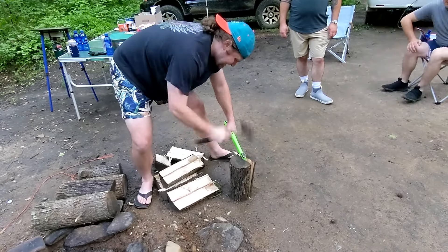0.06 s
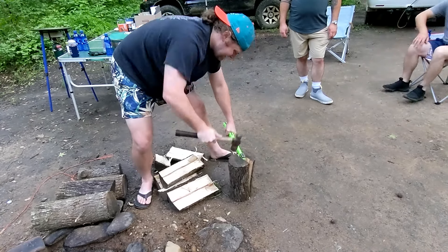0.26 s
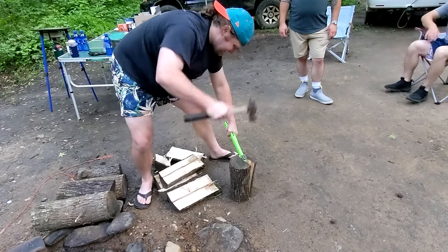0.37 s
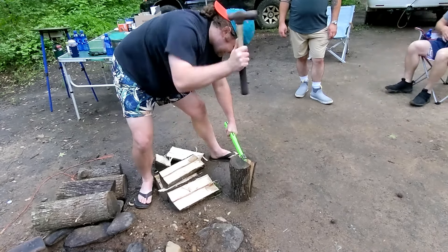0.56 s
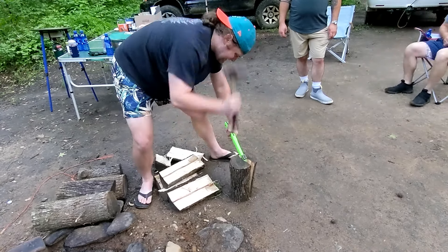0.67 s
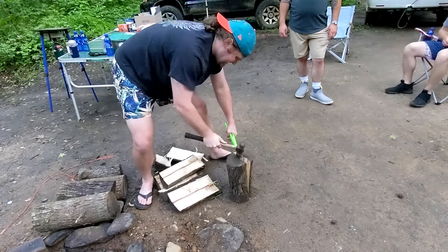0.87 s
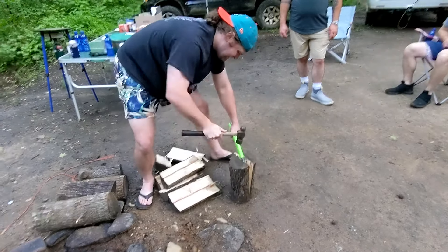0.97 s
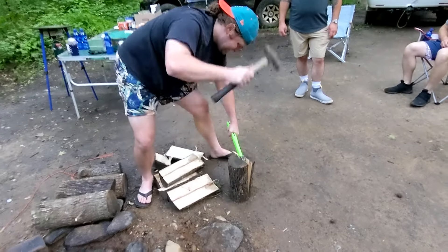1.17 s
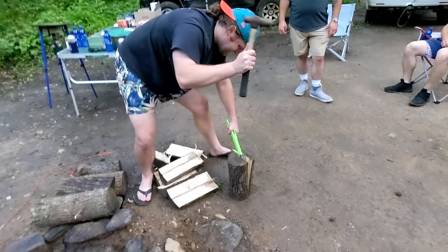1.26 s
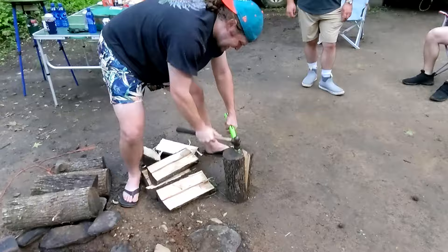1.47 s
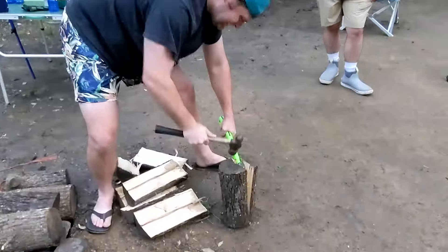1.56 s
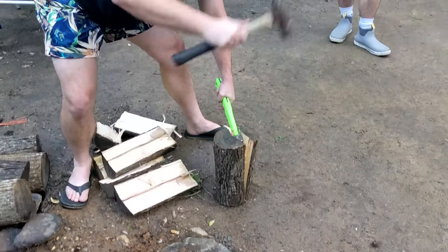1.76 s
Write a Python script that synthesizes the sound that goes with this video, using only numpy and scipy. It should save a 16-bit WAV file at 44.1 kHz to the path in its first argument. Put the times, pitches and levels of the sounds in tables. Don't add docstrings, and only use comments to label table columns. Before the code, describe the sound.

Three loud, bright steel clanks as a hatchet is pounded into a log outdoors, close phone microphone, soft leafy rustle behind, handling knocks on the left after the second blow.

```python
import sys
import numpy as np
from scipy import signal
from scipy.fft import rfft, irfft
from scipy.io import wavfile
from scipy.ndimage import uniform_filter1d, minimum_filter1d

SR = 44100
rng = np.random.default_rng(int(sys.argv[2]) if len(sys.argv) > 2 else 0)


def how_loud(loudness_db):
    steps = np.asarray(loudness_db, float) / 20
    return 10 ** steps


def materialize(psi):
    bounded = np.clip(np.atleast_2d(psi).T, -1, 1)
    quanta = np.round(bounded * 32767).astype(np.int16)
    wavfile.write(sys.argv[1], SR, quanta)


N = 79380
T = np.arange(N) / SR
LEFT_RIGHT = np.array([[1.], [-1.]])


def curve(table, hz):
    table = np.array(table, float)
    return np.interp(np.log(hz), np.log(table[:, 0]), table[:, 1])


def shape(x, table):
    hz = np.arange(N // 2 + 1) * SR / N + 1
    return irfft(rfft(x) * how_loud(curve(table, hz)), N)


def colour(x, table):
    hz = np.maximum(np.arange(N // 2 + 1) * SR / N, 1)
    below = np.maximum(np.log2(table[0][0] / hz), 0)
    above = np.maximum(np.log2(hz / table[-1][0]), 0)
    gain = how_loud(curve(table, hz) - 18 * below - 60 * above)
    return irfft(rfft(x) * gain / np.sqrt(np.mean(gain ** 2)), N)


def ring(x, hz, width_hz):
    return signal.lfilter(*signal.iirpeak(hz, hz / width_hz, SR), x)


def pair(like, pan_db=0.):
    mid, side = rng.standard_normal((2, N))
    like = np.clip(like, 0, 1)
    both = np.sqrt((1 + like) / 2) * mid + np.sqrt((1 - like) / 2) * side * LEFT_RIGHT
    return both * how_loud(LEFT_RIGHT * pan_db / 2)


def burst(at, rise, fall):
    u = T - at - rise
    return np.exp(np.where(u < 0, -(u / rise) ** 2 * 2, -u / fall))


def walk(rate):
    k = int(SR / rate)
    steps = np.repeat(rng.standard_normal(N // k + 1), k)
    return 2.23 * uniform_filter1d(uniform_filter1d(steps, k), k)[:N]


def bands(table):
    spec = rfft(colour(pair(0.29), table))
    hz = np.arange(N // 2 + 1) * SR / N + 1
    for centre in 30 * 2 ** (np.arange(26) / 3):
        slope = np.clip(3 * np.log2(hz / centre), -1, 1)
        yield centre, irfft(spec * np.cos(slope * np.pi / 2) ** 2, N)


# (frequency [Hz], density [dB per Hz])
CAMP_SPECTRUM = [(18, -47.5), (30, -11), (255, -8), (367, -8), (541, -4.5), (1870, -6), (2560, -4),
                 (5580, -12), (10000, -43), (13000, -78), (22000, -120)]
# (frequency [Hz], L-R level [dB])
CAMP_PAN = [(100, 3.5), (700, 2), (2300, 7), (5000, 0.5), (9000, -9.5)]


def camp():
    level_db, drift_db_per_s = -44.5, -1
    hush_db = sum(-1.5 * burst(blow[0], 0.12, 0.055) * (T > blow[0]) for blow in BLOWS)
    floor_db = level_db + drift_db_per_s * T + hush_db + 0.27 * walk(7.1)
    out = 0
    for hz, noise in bands(CAMP_SPECTRUM):
        pan_db = curve(CAMP_PAN, hz) / 2 * LEFT_RIGHT
        out = out + noise * how_loud(floor_db + 1.5 * walk(11.96) + pan_db)
    return out


# (frequency [Hz], density [dB per Hz])
TREES_SPECTRUM = [(530, -53), (900, -23.5), (1390, -7.5), (1570, -10), (2270, -1.5), (4290, -2.5),
                  (5690, -4), (6820, -8), (10000, -41.5), (13000, -66), (22000, -120)]
# (frequency [Hz], 60 dB decay [s])
TREES_T60 = [(1000, 1.6), (2000, 1.34), (3000, 1.32), (6000, 0.94), (9000, 0.97)]
# (level [dB], L-R level at its start [dB])
TAILS = [
    (-28, 6.7),
    (-28, 11.8),
    (-27.5, 12),
]
# (time [s], level [dB], L-R level [dB])
EARLIER = (-0.45, -34, 6)


def trees():
    pan_end_db, pan_s, onset_s = -2.5, 0.11, 0.01
    sources = [EARLIER] + [(blow[0], *tail) for blow, tail in zip(BLOWS, TAILS)]
    out = 0
    for hz, noise in bands(TREES_SPECTRUM):
        for at, db, pan_db in sources:
            u = np.maximum(T - at, 0)
            drift_db = (pan_db - pan_end_db) * np.exp(-u / pan_s)
            pan = pan_end_db + curve(CAMP_PAN, hz) + drift_db
            fade = db - 60 * u / curve(TREES_T60, hz) + 1.2 * walk(30)
            out = out + noise * how_loud(fade + LEFT_RIGHT * pan / 2) * (1 - np.exp(-u / onset_s))
    return out


# (time [s], level [dB], pitch [Hz], decay [s])
KNOCKS = [(.905, -40.5, 388, 0.026), (1.0413, -13, 240, 0.0028), (1.055, -25.5, 242, .004),
          (1.0688, -16, 305, 0.0023), (1.1005, -10, 276, 0.0021), (1.1656, -7, 282, 0.0026),
          (1.191, -22.5, 224, .008), (1.24, -29, 320, 0.0075), (1.2611, -11, 420, 0.0033),
          (1.271, -27, 478, 0.0059), (1.704, -35, 527, 0.009)]


def knocks():
    out = 0
    for at, db, hz, fall in KNOCKS:
        u = np.maximum(T - at, 0)
        turns = hz * (u + 1.09 * 0.00091 * (1 - np.exp(-u / 0.0028)))
        out = out - how_loud(db) * np.sin(2 * np.pi * turns) * np.exp(-u / fall)
    return signal.sosfilt(signal.butter(2, 183.6, "high", fs=SR, output="sos"), out)


# (time [s], level [dB], pitch [Hz], length [s])
TICKS = [(1.042, -29, 2200, 0.0054), (1.068, -29.5, 2400, 0.0041), (1.068, -43, 1900, .001),
         (1.100, -31, 1800, 0.0025), (1.1636, -24.5, 1470, 0.0013), (1.1669, -19, 2280, 0.00068),
         (1.243, -34, 1280, 0.0083), (1.2612, -19, 1510, 0.0027), (1.268, -33, 2060, 0.0027),
         (1.71, -33.5, 1420, 0.0032), (1.263, -24, 2680, 0.0013)]


def nail_ticks():
    noise = np.sign(rng.standard_normal(N))
    out = 0
    for at, db, hz, length in TICKS:
        width_hz = hz * 0.79
        tick = ring(ring(noise * burst(at - length, length, length), hz, width_hz), hz, width_hz)
        out = out + how_loud(db) * 4.42 * tick
    return out


# (start [s], length [s], level [dB], centre [Hz])
RUMBLES = [
    (1.037, 0.094, -43, 90),
    (1.155, 0.048, -47, 90),
    (1.26, 0.055, -63, 90),
]


def hand_rumble():
    noise = rng.standard_normal(N)
    out = 0
    for at, length, db, hz in RUMBLES:
        out = out + how_loud(db) * 26.0 * ring(ring(noise, hz, hz), hz, hz) * burst(at, 0.023, length)
    return out


def fingers():
    left = knocks() + nail_ticks() + hand_rumble()
    return shape(left, [(3500, 1), (6000, -45)]) * how_loud(np.array([[0.], [-40]]))


# (frequency [Hz], density [dB per Hz])
SLAP_SPECTRUM = [(180, -32), (300, -59), (1080, -1.5), (1990, 4.5), (2520, 10.5), (3090, 7.5), (6830, -10),
                 (9290, -26), (10000, -51), (13000, -73), (22000, -120)]
# (delay [s], level [dB], L-R level [dB], rise [s], fall [s])
SLAPS = [
    (0.0343, -13.5, 6, 0.0077, 0.008),
    (0.0328, -14.5, 7.5, 0.0099, 0.0085),
    (0.037, -16, 11, 0.003, 0.0073),
]


def van_slap(k, at):
    lag, db, pan_db, rise, fall = SLAPS[k]
    return how_loud(db) * colour(pair(0.51, pan_db) * burst(at + lag, rise, fall), SLAP_SPECTRUM)


GROUND_DB = [
    -39.5,
    -61,
    -57,
]


def ground_thump(k, at):
    thump = ring(ring(pair(0.67), 90, 77), 90, 77) * burst(at, 0.0093, 0.036)
    return how_loud(GROUND_DB[k]) * 15.4 * thump


# (frequency [Hz], width [Hz], level [dB])
HEAD_RING = [
    (2314, 12, -38),
    (5544, 120, -42.5),
]


def head_ring(at):
    out = 0
    for hz, width_hz, db in HEAD_RING:
        fade = how_loud(db - 60 * np.maximum(T - at, 0) / 1.3) * (T > at)
        out = out + fade * ring(pair(0.66, 4.6), hz, width_hz) * np.sqrt(SR / width_hz / np.pi)
    return out


# (level [dB], L-R level [dB], level in the slap [dB], log thud pitch [Hz])
FIRST_TICKS = [
    (-13.5, -3.5, -23.5, 530),
    (-14.5, 4, -31, 560),
    (-17, -2, -22.5, 504),
]
# (frequency [Hz], density [dB per Hz])
TICK_SPECTRUM = [(2500, -21), (4000, -6.5), (5500, 4), (7200, 0), (8200, -20.5)]


def tick_and_thud(k, at, pan_db, thud_db):
    tick_db, tick_pan_db, echo_db, thud_hz = FIRST_TICKS[k]
    tick_s, echo_at = 0.00072, at + 0.0395
    echo_s = 1.6 * tick_s
    ticks = how_loud(tick_db) * burst(at + 0.0015, tick_s, tick_s) + how_loud(echo_db) * burst(echo_at, echo_s, echo_s)
    shove = burst(at + 0.0013, 0.00053, 0.00028)
    shove = shove + how_loud(echo_db - tick_db) * burst(echo_at, 0.00024, 0.00032)
    thud = ring(ring(shove, thud_hz, 185), thud_hz, 370)
    steel = colour(pair(0.9, tick_pan_db) * ticks, TICK_SPECTRUM)
    return steel + how_loud(thud_db + LEFT_RIGHT * pan_db / 2) * 4.86 * thud


def near_scatter(k, at):
    gate = 1 / (1 + np.exp(np.clip((T - at - 0.035) / 0.0013, -50, 50)))
    return pair(0.35, TAILS[k][1]) * how_loud(-18) * burst(at + 0.0022, 0.0079, 0.069) * gate


# (delay [s], level under the blow [dB])
REBOUNDS = [
    (.007, -19),
    (.0055, -7),
    (0.0037, -9.5),
]


def contact_force(k, at, pan_db, scrape_db):
    rise, fall = 0.0025, 0.002
    delay, rebound_db = REBOUNDS[k]
    scrape = how_loud(scrape_db) * np.exp(np.minimum(T - at, 0) / 0.011) * (T < at)
    rebound = how_loud(rebound_db + np.array([[0], [-8.5]])) * burst(at + delay, rise / 2, fall)
    chatter = np.tanh(1.6 * pair(0.71)) * how_loud(LEFT_RIGHT * pan_db / 2)
    return chatter * 1.34 * (burst(at, rise, fall) + rebound + scrape)


# (frequency [Hz], width [Hz], level [dB])
STEEL = [
    [(1730, 213, 9), (2360, 40, -3), (2850, 200, 1.5), (3280, 49, 1), (3660, 110, -29), (4580, 240, -11),
     (5120, 350, -34.5), (6670, 280, -17)],
    [(1770, 37, -2.5), (2480, 72, 9.5), (3300, 130, -3), (5230, 140, -19), (5250, 140, -14),
     (6900, 89, -43), (6870, 157, -30), (8860, 150, -46)],
    [(1500, 270, -1.5), (2600, 285, 5), (4100, 28, -39), (4760, 95, -31.5), (5400, 110, -15),
     (6300, 110, -19), (6550, 130, -14), (9000, 190, -51)],
]
# (frequency [Hz], density [dB per Hz])
CRACK_SPECTRUM = [(600, -37), (900, -27), (1060, -1), (2400, -0.5), (4000, -8), (5500, -1), (7100, -17.5),
                  (8100, -16)]


def steel_crack(k, push):
    ring_share, widen = 0.45, 1.79
    rings = 5.24 * sum(how_loud(g) * ring(push, hz, width_hz * widen) for hz, width_hz, g in STEEL[k])
    rings = shape(rings, [(850, -25.5), (1050, -1), (7000, -0.5), (8000, -14.5)])
    return ring_share * rings + (1 - ring_share) * colour(push, CRACK_SPECTRUM)


# (time [s], level [dB], L-R level [dB], scrape before contact [dB], wood thud [dB])
BLOWS = [
    (0.171, -8, 4.5, -38, -27.5),
    (.8190, -10.5, 5, -27.5, -36.5),
    (1.4909, -11, 8, -37.5, -26),
]
# (frequency [Hz], extra L-R level [dB])
BLOW_PAN = [(500, 1), (2300, 0.5), (4500, -4), (9000, -12.5)]


def blows():
    out = 0
    for k, (at, db, pan_db, scrape_db, thud_db) in enumerate(BLOWS):
        wash = near_scatter(k, at)
        push = contact_force(k, at, pan_db, scrape_db - db) + 0.4 * wash
        out = out + how_loud(db) * (steel_crack(k, push) + 0.57 * colour(wash, TREES_SPECTRUM))
        out = out + tick_and_thud(k, at, pan_db, thud_db) + van_slap(k, at)
        out = out + ground_thump(k, at) + head_ring(at)
    left = shape(out[0], [(hz, g / 2) for hz, g in BLOW_PAN])
    right = shape(out[1], [(hz, -g / 2) for hz, g in BLOW_PAN])
    return np.array([left, right])


def scene():
    return camp() + trees() + fingers() + blows()


def top_cut(x):
    return signal.sosfilt(signal.butter(12, 16340, fs=SR, output="sos"), x)


# (frequency [Hz], gain [dB])
MIC = [(40, -7.5), (150, 0.5), (7200, 0), (7900, -5.5), (9600, -1), (10000, -50), (16000, -74)]


def record(dry):
    dip_db = sum(-4 * burst(blow[0], 0.058, 0.056) * (T > blow[0]) for blow in BLOWS)
    x = shape(dry, MIC) * how_loud(dip_db)
    look = int(0.002 * SR) | 1
    gain = np.minimum(1, 1.02 / (np.abs(x) + 1e-9))
    gain = uniform_filter1d(minimum_filter1d(gain, look), look)
    return top_cut(np.clip(x * gain + 0.0013, -1, 1))


dry = scene()
out = record(dry)
materialize(out)
```